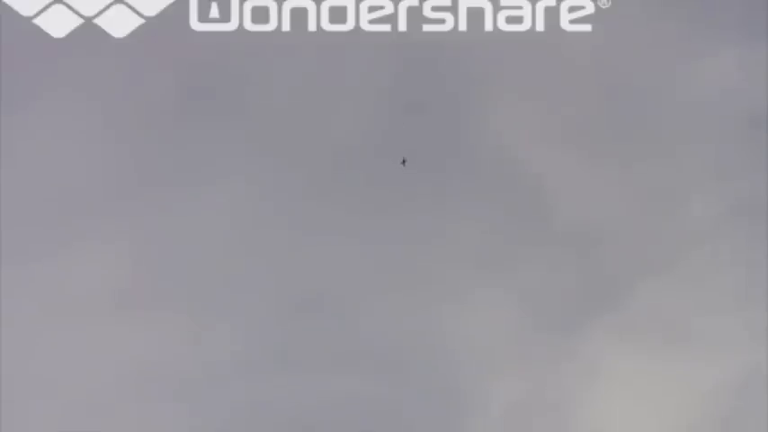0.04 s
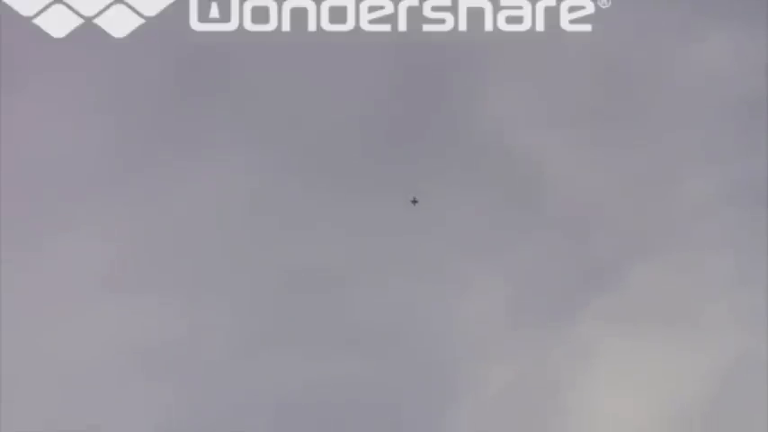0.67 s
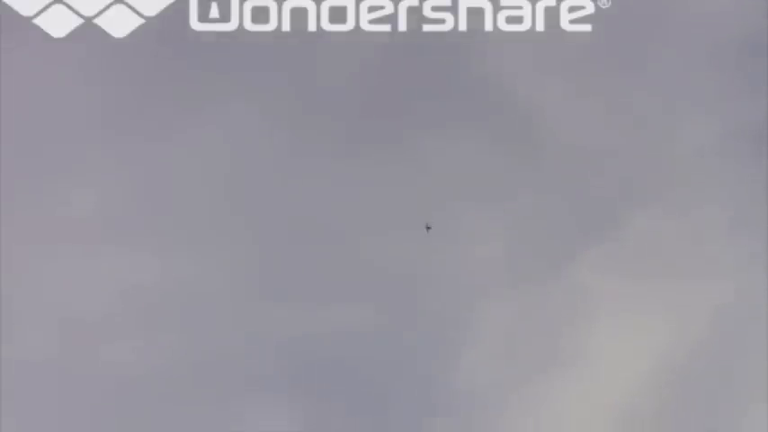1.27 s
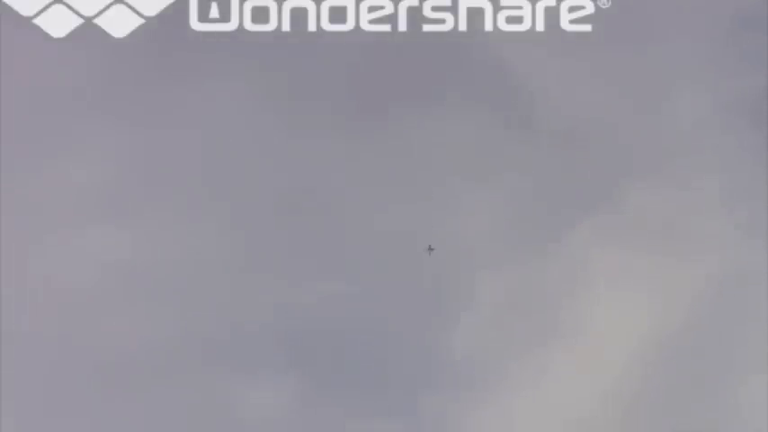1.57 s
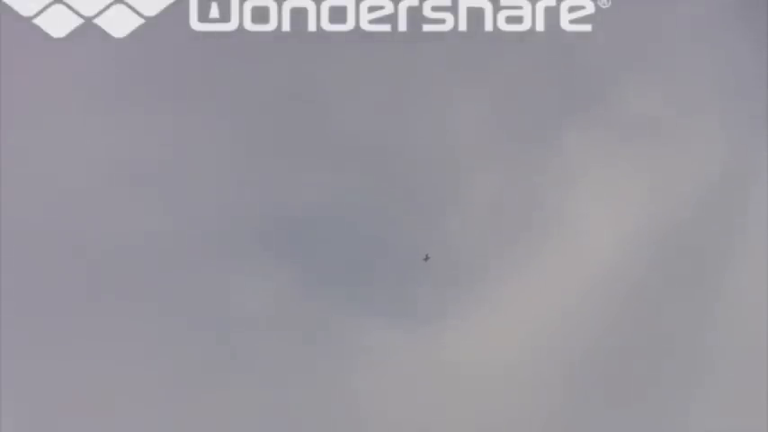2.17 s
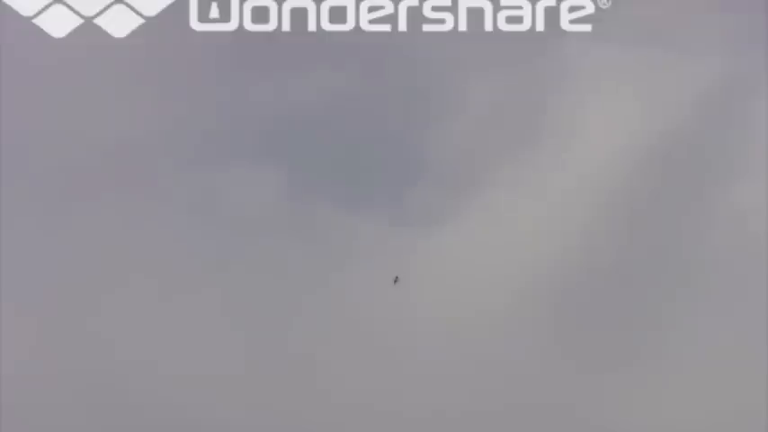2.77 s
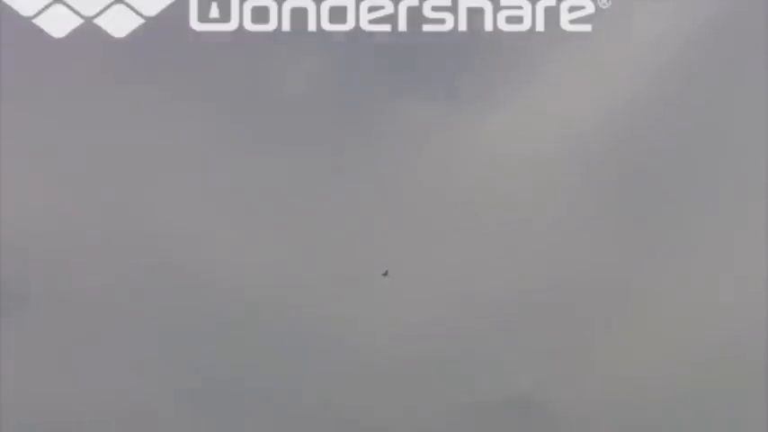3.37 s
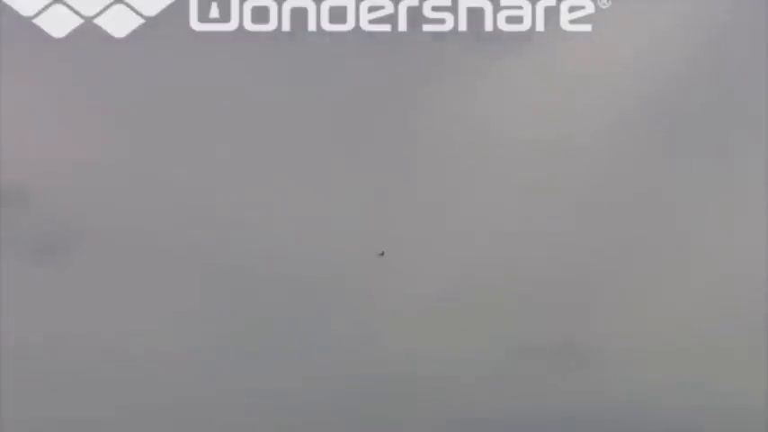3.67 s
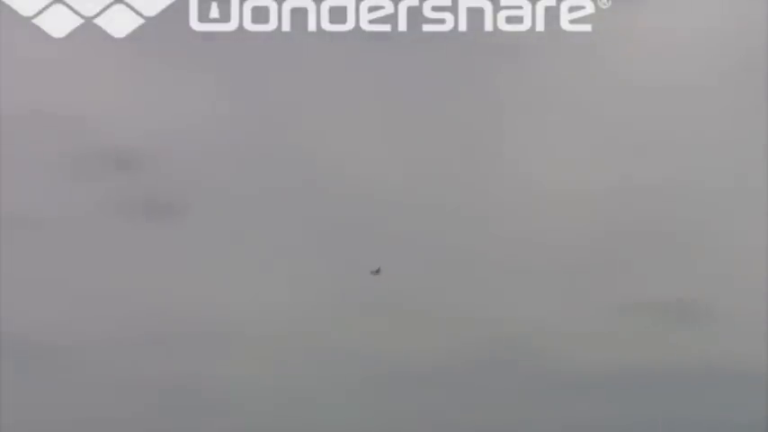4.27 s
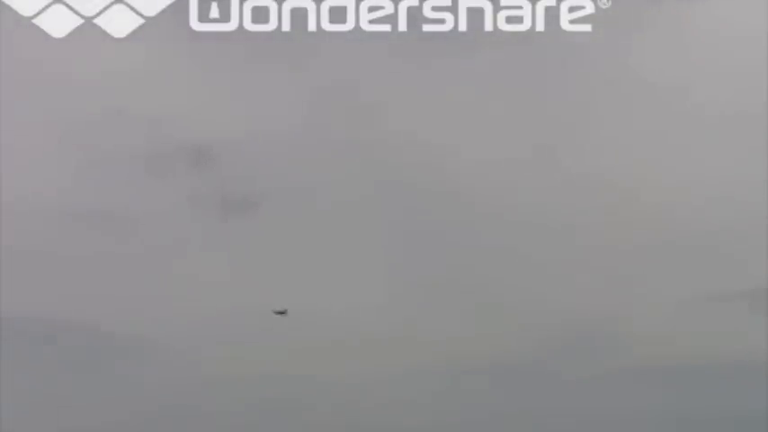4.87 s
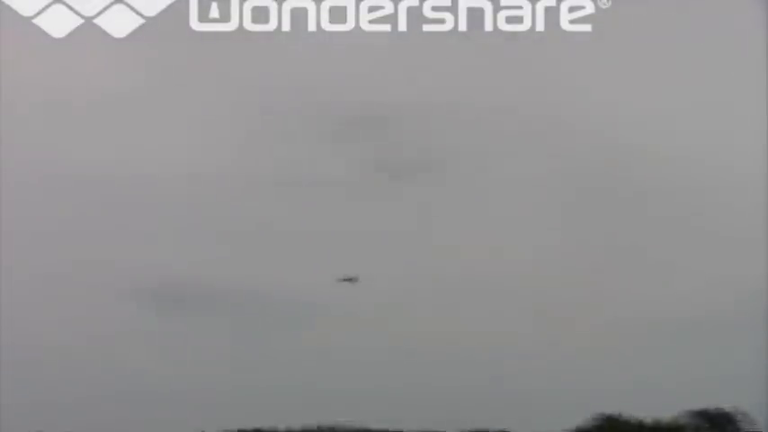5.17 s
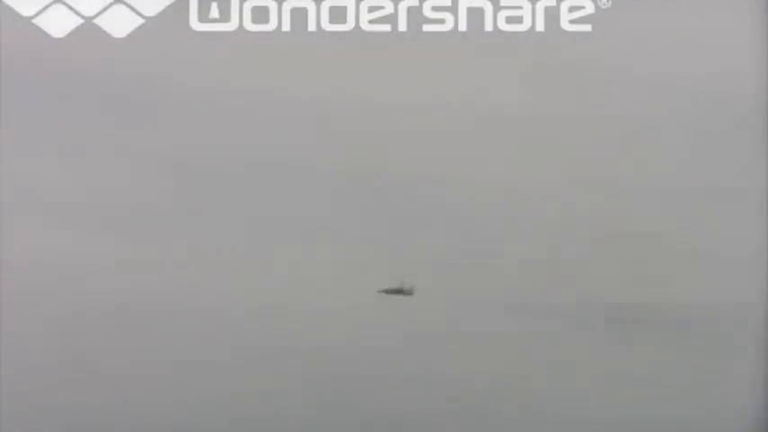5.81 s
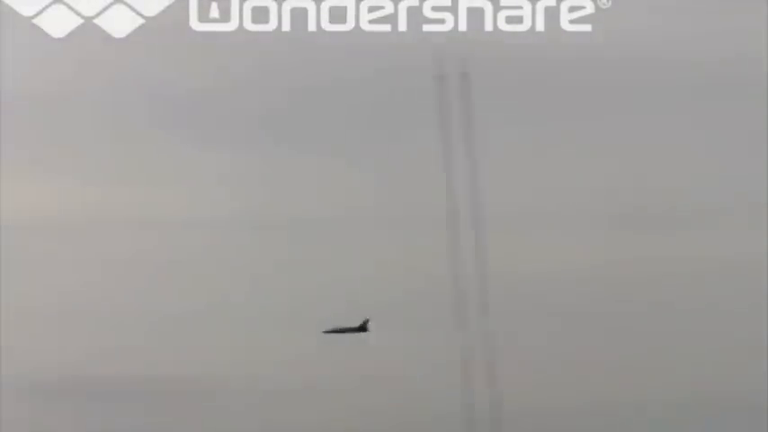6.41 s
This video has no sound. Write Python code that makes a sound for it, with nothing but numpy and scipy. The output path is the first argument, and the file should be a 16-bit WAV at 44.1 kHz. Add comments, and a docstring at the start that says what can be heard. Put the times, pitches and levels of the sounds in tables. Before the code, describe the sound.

A model jet's electric fan whines faintly far off, then rises sharply in pitch and loudness as it rushes low past.

```python
"""A model jet with an electric ducted fan dives in from far off, opens the throttle and flies low past.
Its fan gives shaft tones, a five-blade whine and rushing air, brighter with nearness and throttle.
The echo off open ground sweeps a comb through the jet, so that each tone fades and returns in turn.
Faint chirps and rustles sound early on, over a steady hiss and rumble; a low drone, perhaps a
propeller model elsewhere in the sky, joins halfway."""
import sys
import numpy as np
from scipy import signal
from scipy.io import wavfile
from scipy.ndimage import uniform_filter1d, map_coordinates

SR = 44100
rng = np.random.default_rng(int(sys.argv[2]) if len(sys.argv) > 2 else 0)


def generate_wav(signal):
    """Clip the signal to [-1, 1] and save it as 16-bit WAV at the path in sys.argv[1]."""
    frames = np.transpose(np.atleast_2d(signal))
    scaled = np.clip(frames, -1, 1) * 32767
    pcm = np.round(scaled).astype(np.int16)
    wavfile.write(sys.argv[1], SR, pcm)


N = 293265
TIME = np.arange(N) / SR


def from_db(db):
    """Decibels to gain."""
    return 10 ** (np.asarray(db) / 20)


def rms_one(x):
    """Scale to unit rms."""
    return x / np.sqrt(np.mean(x ** 2) + 1e-20)


def in_time(rows):
    """Each column of an automation table at every sample."""
    times, *columns = np.transpose(rows)
    return [np.interp(TIME, times, c) for c in columns]


def envelope(rows):
    """A level curve in dB as a gain at every sample."""
    return from_db(in_time(rows)[0])


def at_hz(rows, hz):
    """Each column of a spectrum table at one frequency."""
    points, *columns = np.transpose(rows)
    return [np.interp(np.log(hz), np.log(points), c) for c in columns]


def swell(peak_s, half_length_s):
    """A bell-shaped fade in and out."""
    return np.exp(-((TIME - peak_s) / half_length_s) ** 2)


def drift(rate_hz, hop=20, settle=4000):
    """Smooth random modulation of rms 1, changing about `rate_hz` times a second."""
    pole = np.exp(-2 * np.pi * rate_hz * hop / SR)
    white = rng.standard_normal(N // hop + settle + 2)
    slow = signal.lfilter([1], [1, -2 * pole, pole * pole], white)[settle:]
    return np.interp(np.arange(N) / hop, np.arange(len(slow)), rms_one(slow))


def phase_of(hz):
    """Phase of a rotation at a changing speed."""
    return 2 * np.pi * np.cumsum(hz) / SR


def partial(phase, flutter_db, skirt_db, skirt_hz):
    """A tone that flutters in moving air, with a skirt of noise from turbulent inflow."""
    tone = np.sqrt(2) * np.sin(phase + rng.uniform(0, 2 * np.pi))
    flutter = from_db(flutter_db * drift(14.4))
    skirt = drift(skirt_hz) * np.sin(phase) + drift(skirt_hz) * np.cos(phase)
    return tone * flutter + from_db(skirt_db) * skirt


def band_around(phase, half_width_hz):
    """A noise band of rms 1 that tracks a tone's phase."""
    lowpass = signal.butter(2, half_width_hz, fs=SR, output="sos")
    a, b = signal.sosfilt(lowpass, rng.standard_normal((2, N)))
    return rms_one(a * np.sin(phase) + b * np.cos(phase))


def noise_bands():
    """Third-octave noise bands at 0 dB per Hz, each with its centre frequency."""
    edges = np.geomspace(30, 14000, 28)
    white = rng.standard_normal((2, N)) * np.sqrt(SR / 2)
    for k, (low, high) in enumerate(zip(edges, edges[1:])):
        bandpass = signal.butter(3, [low, high], "band", fs=SR, output="sos")
        yield np.sqrt(low * high), signal.sosfilt(bandpass, white[k % 2])


def noise_bed(level_db=-82, mid_db=-6):
    """A steady hiss and rumble that reaches the two microphones mostly in opposite phase."""
    # tone of the bed: (frequency [Hz], relative density [dB])
    spectrum = [(24, -65), (40, -35), (76, -18), (184, -4), (343, 1), (552, 2), (1240, -8), (1820, -18.5),
                (2150, -16.5), (3730, -34), (4300, -21), (8000, -32.5), (10200, -32), (12000, -60),
                (15600, -71), (22000, -120)]
    side, mid = [sum(band * from_db(at_hz(spectrum, hz)[0]) for hz, band in noise_bands())
                 for _ in range(2)]
    return from_db(level_db) * (from_db(mid_db) * mid + side * [[1], [-1]])


def chirps_and_rustles():
    """Short swells of noise: narrow bands chirp, wide ones rustle."""
    # probably far-off birds: (time [s], half length [s], pitch [Hz], half width [Hz], level [dB])
    chirps = [(0.055, 0.025, 1460, 64, -50), (0.12, 0.061, 1490, 56, -56), (0.507, 0.007, 3340, 13, -49),
              (1.722, 0.018, 3520, 60, -58)]
    # soft, close rustles: (time [s], half length [s], centre [Hz], half width [Hz], level [dB])
    rustles = [(0.057, 0.04, 8900, 1300, -65.5), (1.72, 0.022, 9800, 1400, -71)]
    return sum(from_db(db) * swell(s, half_s) * band_around(2 * np.pi * hz * TIME, half_hz)
               for s, half_s, hz, half_hz, db in chirps + rustles)


def drone():
    """One low, slightly unsteady tone that creeps in."""
    # the drone's glide: (time [s], pitch [Hz], level [dB])
    glide = [(2.9, 210.2, -74), (3.45, 244.1, -57), (3.8, 253, -56), (4.1, 248, -65.5), (4.7, 255.3, -61.5),
             (5.0, 257.5, -64), (5.22, 261.5, -55), (5.7, 262, -49), (5.87, 259.6, -51), (6.3, 260, -49),
             (6.45, 256, -39.5), (6.65, 252, -36)]
    hz, db = in_time(glide)
    return from_db(db) * partial(phase_of(hz), flutter_db=2.0, skirt_db=-10.5, skirt_hz=12)


def ground_scatter(jet, scatter_db=-19, above_hz=6500, lag_s=0.012):
    """Rough ground scatters a little treble, which arrives from the sides."""
    treble = signal.sosfilt(signal.butter(4, above_hz, "high", fs=SR, output="sos"), jet)
    return from_db(scatter_db) * np.interp(TIME - lag_s, TIME, treble) * [[1], [-1]]


def over_ground(jet, bass_share=0.58, bass_hz=900):
    """Direct sound and ground echo form a comb; lows return at any angle, grass blurs the very top."""
    # the bounce, its treble inverted by grass at a grazing angle: (time [s], lag [ms], treble [gain])
    bounce = [(0, 6.52, .33), (.45, 6.38, .36), (1, 6.11, .3), (1.5, 5.74, .4), (2, 5.23, .42),
              (2.5, 4.55, .52), (3, 3.86, .54), (3.5, 3.18, .4), (4, 2.54, -.1), (4.65, 1.95, -.35),
              (5.1, 1.65, -.35), (5.3, 1.59, -.38), (5.5, 1.61, -.42), (5.75, 1.77, -.5), (6, 1.79, -.52),
              (6.3, 1.67, .48), (6.45, 1.61, .58), (6.65, 1.51, .58)]
    lag_ms, treble_share = in_time(bounce)
    echo = map_coordinates(jet, [np.arange(N) - lag_ms * SR / 1000], order=3, mode="mirror")
    bass = signal.lfilter(*signal.butter(1, bass_hz, fs=SR), echo)
    treble = uniform_filter1d(echo - bass, size=3)
    return jet + bass_share * bass + treble_share * treble


def controller_whistle():
    """The motor sings thinly, likely from its speed controller's switching; higher as the jet turns in."""
    # the whistle's glide: (time [s], pitch [Hz], level [dB])
    glide = [(2.6, 8520, -92), (3.2, 8500, -85), (3.55, 8700, -94), (4.05, 8915, -85), (4.5, 8900, -79),
             (5.0, 8854, -72), (5.2, 8900, -91)]
    hz, db = in_time(glide)
    return from_db(db) * partial(phase_of(hz), flutter_db=1.5, skirt_db=-10, skirt_hz=40)


def rushing_air(throttle, loud_db, abeam, gust_db=0.7, flicker_db=1.56, trim_db=-0.5, swell_hz=2500):
    """Turbulence from exhaust, duct and blade tips: duller from afar, flickering through the air."""
    # close-up rush before EQ: (frequency [Hz], density [dB], loudness slope [dB/dB], change abeam [dB])
    turbulence = [(50, -56.5, 1, -2), (154, -60.5, 1.22, 8.5), (356, -59.5, 0.93, 0.5),
                  (650, -62, 1.27, -0.5), (835, -63.5, 1.02, 12.5), (1950, -63, 1.1049, -0.5),
                  (3720, -62.5, 1.19, -2), (5520, -71, 1.23, 5), (6960, -77.5, 1.26, 9)]
    # EQ on the rush: (frequency [Hz], part throttle [dB], full throttle [dB])
    colour = [(46, -30, -56), (134.3, -5, -14.5), (219, -5, -9), (369, 2, 1), (580, -1, -5), (750, 3, 1),
              (1540, 0.05, -5), (2020, 6.5, -1), (2650, 3.5, -4), (3410, -0.5, 0.5), (5450, 0, -8.5),
              (8087, -0.5, 2), (10300, -3.5, 0.4), (12800, -22, -9.5)]
    # the hiss swells and lulls in moving air: (time [s], half length [s], treble change [dB])
    swells = [(0.734, 0.13, -4.5), (1.83, 0.17, -3.5), (2.659, 0.04, 3.5), (2.964, 0.13, -5.5),
              (3.724, 0.091, 2.5), (3.96, 0.07, 0.5), (4.116, 0.044, 8.5), (4.396, 0.1, 4.5),
              (4.937, 0.14, 8)]
    gust, out = drift(3.2), np.zeros(N)
    swell_db = sum(db * swell(s, half_s) for s, half_s, db in swells)
    for hz, band in noise_bands():
        near_db, slope, abeam_db = at_hz(turbulence, hz)
        part_db, full_db = at_hz(colour, hz)
        level_db = trim_db + near_db + slope * loud_db + abeam * abeam_db
        shelf_db = swell_db * hz ** 2 / (hz ** 2 + swell_hz ** 2)
        colour_db = part_db + throttle * (full_db - part_db)
        waver_db = gust_db * gust + flicker_db * drift(12.0)
        out += band * from_db(level_db + shelf_db + colour_db + waver_db)
    return out


def blade_rasp(blade, throttle):
    """Blades chop swirling eddies: rough noise bands just under the whine and around its overtones."""
    # the band under the whine: (time [s], level [dB re jet loudness])
    main_level = [(0.2, -41), (0.95, -32.5), (1.2, -27), (1.5, -34), (1.9, -30.5), (2.35, -43), (2.68, -32),
                  (3.1, -35.5), (3.6, -31), (4.55, -34), (4.95, -24.5), (5.15, -29.5), (5.6, -35.5),
                  (6.4, -40)]
    # upper bands, re jet loudness: (blade harmonic [number], part throttle [dB], full throttle [dB])
    overtones = [(2, -43, -49.5), (3, -53, -49), (4, -60.5, -78)]
    out = envelope(main_level) * band_around(0.99 * blade, half_width_hz=150)
    out *= from_db(2.5 * drift(13.4))
    for order, part_db, full_db in overtones:
        band = band_around(round(order) * blade, half_width_hz=310)
        level_db = part_db + throttle * (full_db - part_db)
        out += band * from_db(level_db + 4.0 * drift(13.4))
    return out


def shaft_tones(shaft, throttle, abeam):
    """Rotor unbalance sounds the shaft's first three harmonics; unequal blades add weak higher ones."""
    # one fader curve per harmonic: (time [s], level [dB re jet loudness])
    fundamental = [(0.0, -27.5), (0.4, -24), (0.72, -25), (1.1, -37), (1.7, -40), (2.43, -33.5),
                   (2.7, -40.5), (3.1, -33), (3.55, -44), (4.05, -25), (4.18, -28.5), (4.3, -35),
                   (4.55, -37.5), (5.03, -27), (5.37, -40.5), (5.44, -30), (5.485, -21), (5.525, -33.5),
                   (5.6, -24.5), (5.78, -28.5), (6.0, -22.5), (6.35, -35.5), (6.57, -27.5)]
    second = [(1.2, -48.5), (1.8, -35.5), (2.05, -40), (2.55, -37.5), (2.95, -40.5), (3.25, -35),
              (3.7, -41.5), (4.3, -42.5), (5.45, -40.5), (5.62, -37.5), (6.12, -36), (6.3, -45.5)]
    third = [(0.5, -39.5), (1.15, -46), (1.55, -31), (2.3, -42), (3.05, -38), (3.95, -52), (4.28, -36),
             (4.75, -35.5), (5.1, -56), (5.62, -42.5), (6.0, -36), (6.15, -35.5), (6.3, -41), (6.5, -43)]
    # tones beside the whine, re jet loudness: (shaft harmonic [number], approaching [dB], abeam [dB])
    side_tones = [(4, -43.5, -40.5), (6, -49, -51), (7, -51, -52), (9, -60, -47)]
    out = envelope(fundamental) * partial(shaft, flutter_db=1.5, skirt_db=-13.5, skirt_hz=30)
    for order, curve in [(2, second), (3, third)]:
        tone = partial(order * shaft, flutter_db=2.5 - 0.94 * throttle, skirt_db=-9, skirt_hz=35.2)
        out += envelope(curve) * tone
    for order, ahead_db, abeam_db in side_tones:
        gain = from_db(ahead_db + np.sqrt(abeam) * (abeam_db - ahead_db))
        out += gain * partial(round(order) * shaft, flutter_db=-1.5, skirt_db=-29, skirt_hz=40)
    return out


def blade_whine(blade, throttle, abeam):
    """Blades passing the vanes beam an uneven whine from the intake, its overtones more smeared."""
    # one fader curve per harmonic, the fourth riding under the third: (time [s], level [dB re jet loudness])
    fundamental = [(0.0, -33), (0.16, -27), (0.3, -38), (0.53, -36), (0.72, -26.5), (0.83, -31),
                   (0.96, -23.5), (1.14, -21), (1.35, -37), (1.75, -28), (1.87, -27.5), (2.02, -21.5),
                   (2.3, -33.5), (2.45, -28), (2.75, -34), (3.0, -28.5), (3.25, -29.5), (3.4, -32),
                   (3.7, -44), (5.33, -38), (5.38, -19.5), (5.43, -30.5), (5.48, -26.5), (5.6, -26),
                   (6.0, -32.5), (6.16, -43.5), (6.33, -26), (6.43, -24.5), (6.53, -29.5), (6.62, -43)]
    octave = [(0.15, -49), (0.41, -36.5), (0.6, -39), (0.87, -39.5), (1.1, -45), (1.42, -49), (1.6, -39.5),
              (2.3, -46.5), (2.95, -65), (3.3, -45), (4.0, -43), (5.48, -53), (5.56, -41), (5.9, -37),
              (6.2, -44), (6.45, -35.5), (6.65, -44)]
    third = [(0.6, -58), (1.25, -56), (1.8, -63), (3.9, -70), (4.35, -52), (5.1, -62), (5.3, -51),
             (5.45, -48), (5.6, -59), (6.2, -48), (6.45, -42), (6.65, -51)]
    flutter_db = 2.0 - 1.2 * throttle + 1.5 * abeam
    smear_db = 7 * throttle
    out = envelope(fundamental) * partial(blade, flutter_db, skirt_db=-15, skirt_hz=82)
    tone = partial(2 * blade, flutter_db=3.5 - 1.5 * throttle, skirt_db=smear_db - 13, skirt_hz=90.5)
    out += envelope(octave) * tone
    for order, drop_db in [(3, 0), (4, -8 - 16 * throttle)]:
        tone = partial(order * blade, flutter_db=4.0, skirt_db=smear_db - 6, skirt_hz=130)
        out += envelope(third) * from_db(drop_db) * tone
    return out


def ducted_fan(shaft_hz, throttle, abeam, blades=5, wobble=0.00064):
    """One slightly wavering rotor drives the shaft tones, the whine and the rasp."""
    shaft = phase_of(shaft_hz * (1 + wobble * drift(16.3)))
    blade = blades * shaft
    tones = shaft_tones(shaft, throttle, abeam) + blade_whine(blade, throttle, abeam)
    return tones + blade_rasp(blade, throttle)


def scene(abeam_from_s=6.187, abeam_takes_s=0.32):
    """The jet stays centred; opening the throttle raises the pitch and brings the rush forward."""
    # fan speed as heard, Doppler shift included: (time [s], shaft rate [Hz])
    fan_speed = [(0.0, 420.3), (1.1, 420.3), (1.6, 425), (2.0, 430.7), (2.5, 440.5), (2.8, 447.6),
                 (3.08, 455.3), (3.2, 454.3), (3.29, 442.7), (3.55, 441.5), (3.7, 420.8), (4.03, 402.8),
                 (5.1, 407), (5.2, 425), (5.28, 455.4), (5.35, 514.3), (5.46, 646.2), (5.545, 743),
                 (5.73, 738), (6.15, 719), (6.34, 701), (6.45, 693.2), (6.65, 669.7)]
    # jet loudness, set by distance and thrust: (time [s], level [dB re nearest point])
    loudness = [(0.0, -23.5), (0.7, -25.5), (2.6, -24), (3.65, -20.5), (4.0, -22.5), (4.7, -22),
                (4.92, -20.5), (5.12, -18.5), (5.35, -12), (5.42, -9.5), (5.48, -4), (5.63, -1),
                (6.08, -1.5), (6.2, -0.5), (6.65, -1)]
    (shaft_hz,), (loud_db,) = in_time(fan_speed), in_time(loudness)
    throttle = np.clip((shaft_hz - 450) / 250, 0, 1)   # 0 part, 1 full
    abeam = np.clip((TIME - abeam_from_s) / abeam_takes_s, 0, 1)   # 0 shows the intake, 1 the exhaust
    fan = from_db(loud_db) * ducted_fan(shaft_hz, throttle, abeam)
    jet = fan + rushing_air(throttle, loud_db, abeam) + controller_whistle()
    return over_ground(jet) + ground_scatter(jet) + drone() + chirps_and_rustles() + noise_bed()


def record(dry, cutoff_hz=14100):
    """The right microphone has treble resonances of its own; a steep low-pass cuts the top of both."""
    # right-side resonances: (frequency [Hz], width [Hz], added share [gain])
    resonances = [(3660, 85, 0.27), (7000, 590, -0.22), (10300, 650, 0.94)]
    left, right = dry
    peaks = sum(share * signal.lfilter(*signal.iirpeak(hz, hz / width_hz, fs=SR), right)
                for hz, width_hz, share in resonances)
    lowpass = signal.ellip(12, .1, 90, cutoff_hz, fs=SR, output="sos")
    return signal.sosfilt(lowpass, [left, right + peaks])


dry = scene()
out = record(dry)
generate_wav(out)
```